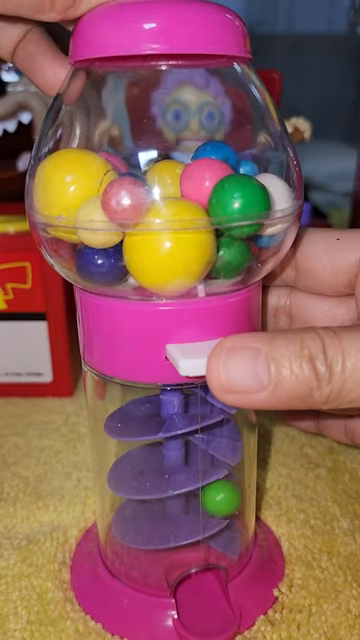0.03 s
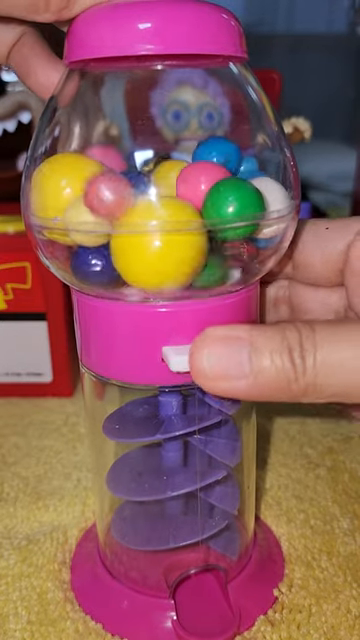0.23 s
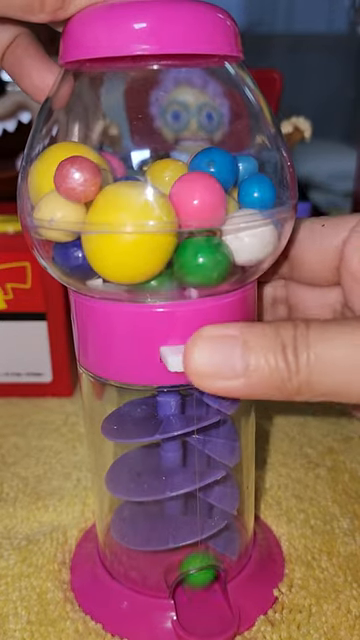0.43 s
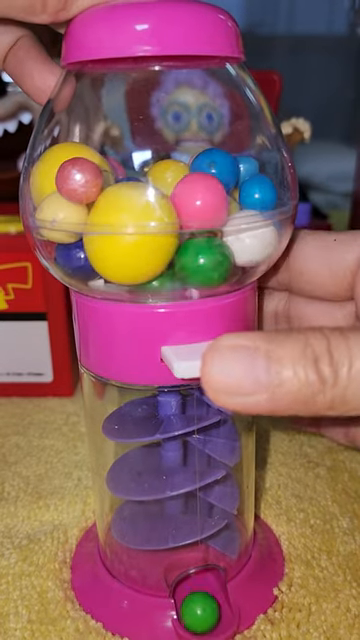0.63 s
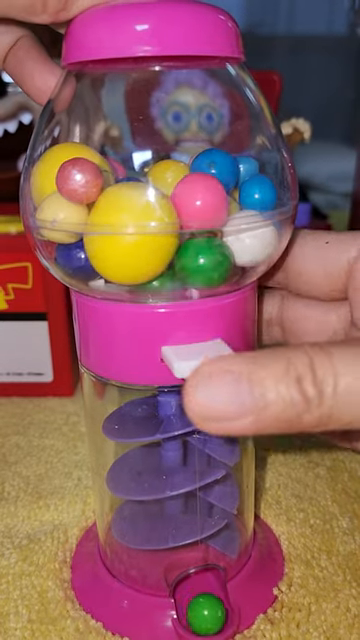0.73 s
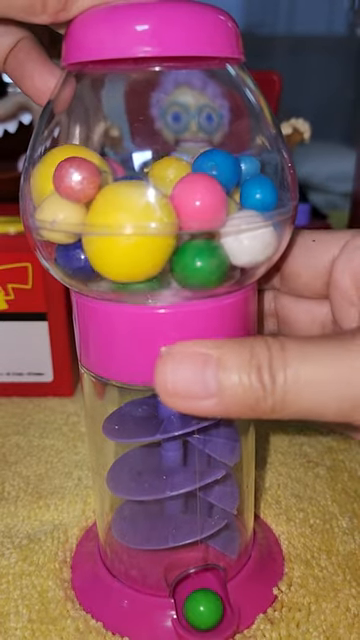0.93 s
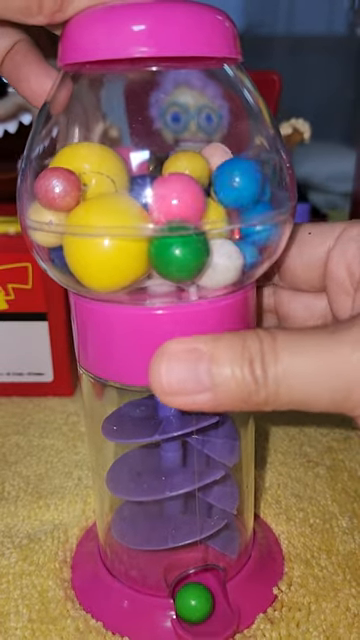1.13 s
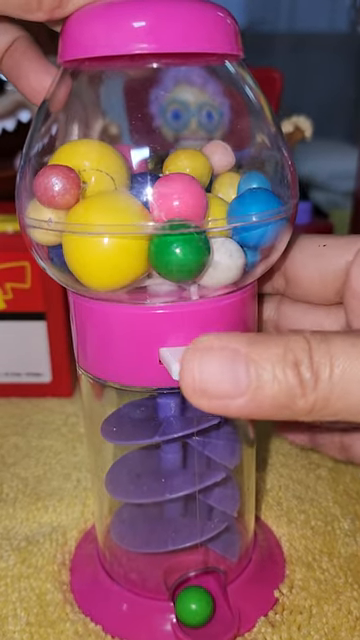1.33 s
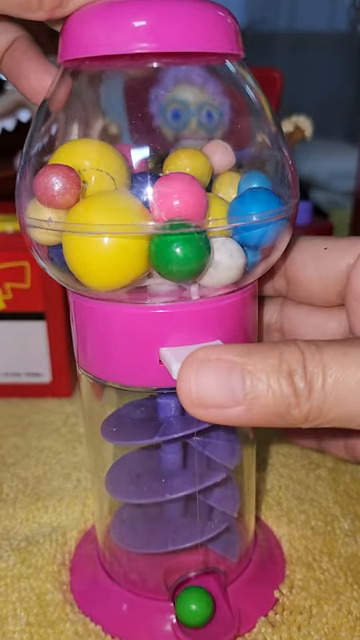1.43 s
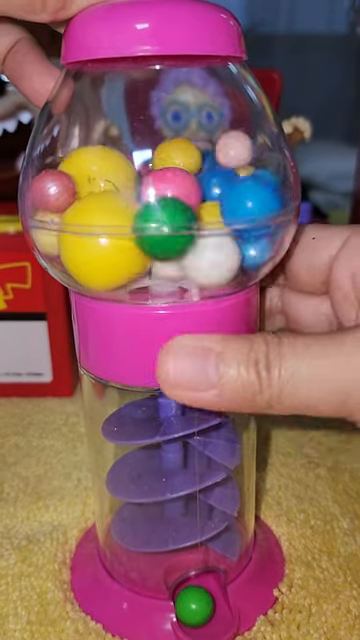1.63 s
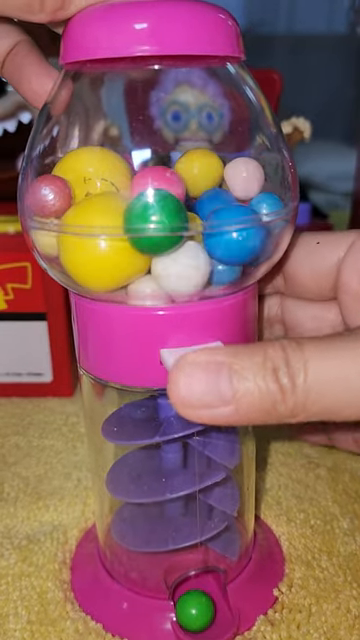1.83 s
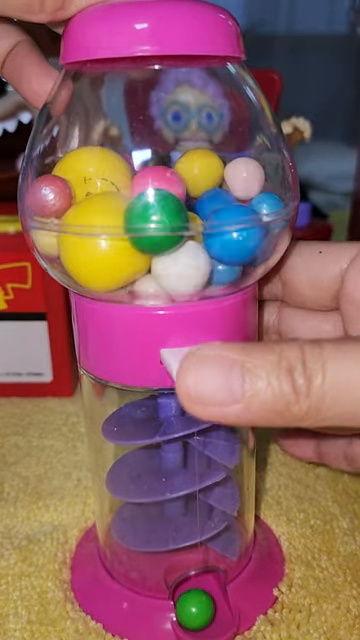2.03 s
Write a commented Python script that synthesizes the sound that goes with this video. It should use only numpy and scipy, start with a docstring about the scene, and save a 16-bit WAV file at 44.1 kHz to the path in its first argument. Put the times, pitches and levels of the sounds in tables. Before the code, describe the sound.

Plastic toy gumball machine rattling and snapping as its lever is pushed three times.

```python
"""A plastic toy gumball machine, close by in a small quiet room, has its lever pushed three times.
Each push churns the balls in the globe: they rattle, ring the shell and boom in the hollow body,
then the sprung lever snaps back. At first a ball rolls and ticks down the spiral chute and drops
into the tray. Another clacks down after the second push, and others settle with single knocks.
A low rumble lies under it all."""
import sys
import numpy as np
from scipy import signal
from scipy.fft import rfft, irfft
from scipy.io import wavfile
from scipy.ndimage import uniform_filter1d

SR = 44100
rng = np.random.default_rng(int(sys.argv[2]) if len(sys.argv) > 2 else 0)


def dump_mix(stems):
    """Bounce the given channels to the path in sys.argv[1] as a 16-bit WAV at rate SR."""
    frames = np.atleast_2d(stems).T  # one column per channel
    limited = np.clip(frames, -1, 1)  # hard clip at full scale
    pcm = np.round(limited * 32767).astype(np.int16)
    wavfile.write(sys.argv[1], SR, pcm)


N = 92610
T = np.arange(N) / SR
ALIKE_BELOW_HZ = 995  # sound is centred below this and wide above it

# One envelope per push. Each row: time in seconds, rattle level in dB, boom level in dB.
PUSHES = [
    [(0.235, -28, -32.5), (0.265, -34, -19), (0.271, -23, -21.5), (0.297, -29.5, -31), (0.313, -27, -30.5),
     (0.333, -43, -27.5), (0.399, -50.5, -42), (0.407, -38.5, -44), (0.44, -58, -49.5)],
    [(0.92, -69, -47), (0.964, -23, -28), (0.98, -30, -41), (0.996, -26.5, -15.5), (1.01, -24.5, -56),
     (1.054, -31, -34.5), (1.072, -38.5, -28), (1.09, -70, -67), (1.13, -65, -73)],
    [(1.56, -59.5, -47), (1.57, -56, -48.5), (1.606, -30, -28.5), (1.63, -23.5, -27), (1.646, -23, -25.5),
     (1.708, -32, -33.5), (1.732, -43.5, -64), (1.746, -60, -51.5), (1.78, -51, -63.5)],
]
# The globe's shell. Each row: frequency in Hz, level in dB, t60 in seconds.
SHELL_MODES = [(326, -25.5, 0.073), (1328, -12.5, 0.13), (1715, 2, 0.042), (2153, -5, 0.03),
               (2736, -17.5, 0.045), (3784, -4, .025), (5600, -24.5, 0.089), (7240, -25.5, 0.041)]
# The air in the hollow body. Each row: frequency in Hz, level in dB, t60 in seconds.
AIR_MODES = [(673, -28, 0.066), (786.6, -3.5, 0.099), (823.7, -5.5, 0.11)]
def churn():
    """The lever stirs the balls: dense clicks that ring the shell and the air inside."""
    rattle_gain = sum(envelope(*np.array(push)[:, [0, 1]].T) for push in PUSHES)
    boom_gain = sum(envelope(*np.array(push)[:, [0, 2]].T) for push in PUSHES)
    hits = contacts(per_s=1500)
    clicks = rattle(hits * rattle_gain)
    shell = resonate(hits * rattle_gain, SHELL_MODES)
    boom = resonate(hits * boom_gain, AIR_MODES)
    return amp(-0.5) * clicks + amp(-3.5) * shell + amp(-4.5) * boom


# EQ of the plastic rattle. Each row: frequency in Hz, gain in dB.
RATTLE_EQ = [(35, -31), (80, -12.5), (160, -3), (310, 6.5), (430, -5.5), (650, 12), (1050, 2), (1500, 5.5),
             (2500, 8.5), (4200, 4), (6500, -3.5), (7600, -7), (9000, -9), (12000, -7.5), (15500, -16)]
def rattle(hits, tilt_db=0, t60=0.011):
    """Every contact makes its own short plastic click."""
    pole = fade(2 / SR, t60)  # power dies twice as fast as amplitude
    power = signal.lfilter([1 - pole], [1, -pole], hits ** 2 + 1e-18)
    return colour(np.sqrt(power) * noise(N), RATTLE_EQ, tilt_db)


# The lever hits its stop. Each row: time in seconds, crack level in dB, ring level in dB,
# crack t60 in seconds, brightness in dB per octave.
SNAPS = [(0.4868, -9, -11, .016, 0.5), (1.1880, -10, -11, 0.022, 0.5), (1.8147, -11, -13.5, 0.019, 1)]
# EQ of the crack. Each row: frequency in Hz, gain in dB.
SNAP_EQ = [(40, -2), (200, -5), (430, -22), (900, -14.5), (1450, 12.5), (2200, -1.5), (3300, 5), (5400, 0),
           (7200, 0.5), (8500, 3), (9400, 1), (10800, 5), (11600, 0.5), (12600, 8), (13700, -5),
           (15000, 3.5), (16000, -23)]
# The lever and its housing. Each row: frequency in Hz, level in dB, t60 in seconds.
LEVER_MODES = [(799.5, -22.5, .22), (1290, -22.5, 0.062), (1288, -20, 0.12), (1447, -22, 0.033),
               (1711, -10, 0.13), (3005, -20, 0.062), (4070, -21.5, 0.085), (5200, -30, 0.089),
               (5370, -12, 0.06), (5740, -36, .04), (12800, -24.5, .03)]
def lever_snaps(lead_s=0.02, rise_s=0.00025, slide_s=0.0075, slide_db=-27):
    """The spring throws the lever back: a brief scrape, a bright crack, a ringing housing."""
    out = np.zeros((2, N))
    t = T[:SR // 4] - lead_s  # zero at the impact
    approach = np.exp(-np.abs(t) / rise_s) + amp(slide_db) * np.exp(-np.abs(t) / slide_s)
    for impact, crack_db, ring_db, t60, tilt_db in SNAPS:
        shape = np.where(t < 0, approach, fade(np.abs(t), t60))
        crack = colour(shape * noise(len(t)), SNAP_EQ, tilt_db)
        add(out, impact - lead_s, amp(crack_db) * crack)
        add(out, impact, amp(ring_db) * ring(LEVER_MODES))
    return out


# Single balls on plastic. Each row: start in seconds, click level in dB, shell level in dB,
# boom level in dB, brightness in dB per octave.
KNOCKS = [(0.2703, -12.5, -24.5, -24, 1), (0.288, -24, -27, -20.5, 4.5), (0.326, -22, -36, -21, -1.5),
          (0.4095, -23.5, -39, -47, 0), (0.5025, -18, -26.5, -43.5, 0.5), (0.573, -27, -48.5, -39.5, -1),
          (0.669, -40.5, -34.5, -50, -2.5), (0.728, -54.5, -60, -51.5, 2),
          (0.8645, -50.5, -60.5, -66.5, -0.5), (0.896, -35.5, -43, -57, -2), (0.912, -41.5, -42, -53, -8),
          (0.9325, -32, -56, -38.5, -3.5), (0.961, -21, -26, -28.5, 5), (0.970, -23.5, -27.5, -26.5, -7.5),
          (0.9922, -14, -24, -16, 5.5), (1.01, -14.5, -43, -37, 4), (1.017, -20, -50, -27, 5),
          (1.0575, -21.5, -55, -34, -1.5), (1.144, -42, -42, -39, 2), (1.532, -48.5, -57, -62, 7),
          (1.5512, -46.5, -53, -51, 6), (1.580, -42.5, -45.5, -53, -10), (1.608, -21, -44, -24.5, 1),
          (1.629, -21, -31, -27, 4), (1.635, -14.5, -25, -23, 3), (1.659, -20.5, -26.5, -26.5, 5),
          (1.684, -20, -40, -25, 3.5), (1.7025, -20, -27, -19.5, 4), (1.7705, -33, -38.5, -63.5, -4.5),
          (2.077, -63, -66, -53, -5)]
# EQ of a ball's click. Each row: frequency in Hz, gain in dB.
KNOCK_EQ = [(30, -26.5), (100, -30), (300, -6.5), (430, -22), (700, 11), (1050, -5), (1500, 7), (2500, 6),
            (4200, 5), (6500, -8.5), (7600, -1.5), (9000, -9.5), (12000, -9.5), (15500, -22)]
def ball_knocks():
    """Single balls strike the globe, lever and tray; a softer touch dulls click and shell alike."""
    out = np.zeros((2, N))
    pivot_hz = SHELL_MODES[2][0]  # the shell's strongest mode
    for start, click_db, shell_db, boom_db, tilt_db in KNOCKS:
        click = colour(burst(t60=0.021, rise_s=0.00016), KNOCK_EQ, tilt_db)
        shell = ring([(hz, db + tilt_db * np.log2(hz / pivot_hz), t60) for hz, db, t60 in SHELL_MODES])
        add(out, start, amp(click_db) * click + amp(shell_db) * shell + amp(boom_db) * ring(AIR_MODES))
    return out


# Two landings, each with one bounce. Each row: start in seconds, clack level in dB,
# brightness in dB per octave, ring level in dB.
DROPS = [(0.4713, -6.5, -1.7, -29), (0.4753, -14, -2.5, -30), (1.2997, -14, -0.2, -35.5),
         (1.304, -14, -3.1, -25.5)]
# EQ of the clack. Each row: frequency in Hz, gain in dB.
DROP_EQ = [(40, -22.5), (300, -8), (450, -9.5), (700, -1.5), (1000, -4.5), (1450, 5), (2200, -0.5),
           (3000, 3), (4200, 6), (6300, -2.5), (8500, -8.5), (11000, -3.5), (15500, -14)]
# The plate the ball lands on. Each row: frequency in Hz, level in dB, t60 in seconds.
PLATE_MODES = [(656.4, -6, 0.046), (817, -7, 0.08), (1430, -13.5, 0.02), (1710, -3.5, 0.086)]
def ball_drops():
    """A falling ball lands on hard plastic with a hollow double clack."""
    out = np.zeros((2, N))
    for start, clack_db, tilt_db, ring_db in DROPS:
        clack = colour(burst(t60=0.019, rise_s=0.00017), DROP_EQ, tilt_db)
        add(out, start, amp(clack_db) * clack + amp(ring_db) * ring(PLATE_MODES))
    return out


# The run down the chute. Each row: time in seconds, tube pitch in Hz, level in dB.
ROLL = [(0, 850, -40.5), (0.07, 842, -40.5), (0.15, 812, -43), (0.22, 775, -41), (0.33, 780, -40),
        (0.43, 790, -54.5)]
def ball_roll(waver_hz=22.6, roughness=0.72):
    """The rolling ball sounds the tube's air, lower as it descends, and grinds over the ramp."""
    times, hz, db = np.array(ROLL).T
    lowpass = signal.butter(2, waver_hz, fs=SR, output="sos")
    drift = signal.sosfilt(lowpass, rng.standard_normal((2, 2 * N)))[:, N:]
    waver = 1 + roughness * (unit(drift[0]) + 1j * unit(drift[1]))  # shakes level and phase
    phase = 2 * np.pi * np.cumsum(np.interp(T, times, hz)) / SR
    tube = unit(np.real(waver * np.exp(1j * phase)))
    gain = envelope(times, db)
    grit = rattle(gain * contacts(per_s=510), tilt_db=-3)
    return gain * tube + amp(-5) * grit


# Touches on the chute wall. Each row: start in seconds, level in dB, brightness in dB per octave.
TICKS = [(0.009, -29.5, -2.5), (0.042, -32, 0), (0.0444, -32, -5), (0.0818, -26, 1), (0.109, -26.5, -3),
         (0.1197, -28.5, -3.5), (0.144, -31, 2), (0.160, -28.5, -0.5), (0.184, -28.5, -4),
         (0.2231, -17, -1.5), (0.239, -27, -0.5), (0.371, -27, 2), (0.4045, -32, 3)]
# EQ of a tick. Each row: frequency in Hz, gain in dB.
TICK_EQ = [(200, -12), (800, -2), (1800, 9), (3000, -4), (4500, 5.5), (5900, 5), (6800, -9), (7700, -14.5),
           (9000, -4), (10500, -6.5), (13300, -5.5), (15000, -11.5)]
# The chute wall. Each row: frequency in Hz, level in dB, t60 in seconds.
CHUTE_MODES = [(1770, -4.5, .03), (4410, -7, 0.027), (5850, -2.5, 0.029), (7600, -3.5, 0.013),
               (10620, -7, 0.023)]
def chute_ticks():
    """The rolling ball glances off the thin chute and rings it lightly."""
    out = np.zeros((2, N))
    for start, db, tilt_db in TICKS:
        click = colour(burst(t60=0.022, rise_s=0.00056), TICK_EQ, tilt_db)
        add(out, start, amp(db) * (click + amp(-9.5) * ring(CHUTE_MODES)))
    return out


# A small swell before the third push. Each row: time in seconds, level in dB.
RUB = [(1.33, -64), (1.40, -63), (1.45, -54), (1.52, -59.5), (1.57, -61.5)]
# EQ of the rub. Each row: frequency in Hz, gain in dB.
RUB_EQ = [(300, -6), (1500, 3), (5000, -1), (7000, 4.5), (9000, -1), (15000, -4.5)]
def rub():
    """A faint hiss of friction, like a thumb sliding on the plastic."""
    return envelope(*np.array(RUB).T) * unit(colour(noise(N), RUB_EQ))


# EQ of the reverb tail. Each row: frequency in Hz, gain in dB.
ROOM_EQ = [(100, 13), (400, 5), (800, -2.5), (2500, -3.5), (5000, -3), (7500, 6), (12000, 0), (16000, -3)]
def room(x, low_t60=0.44, treble_t60=0.26, split_hz=5600, rise_s=0.0027, echo_s=0.0148):
    """The small room adds one near reflection and a short tail whose treble dies first."""
    t = T[:SR * 3 // 4]
    wash = noise(len(t))
    low = signal.sosfiltfilt(signal.butter(2, split_hz, fs=SR, output="sos"), wash)
    tail = low * fade(t, low_t60) + (wash - low) * fade(t, treble_t60)
    tail *= 1 - np.exp(-t / rise_s)
    tail = colour(tail / np.sqrt(np.sum(tail ** 2) / 2), ROOM_EQ)
    out = x + amp(-13.5) * signal.fftconvolve(x, tail, axes=1)[:, :N]
    add(out, echo_s, amp(-21) * x)
    return out


# EQ of the room tone. Each row: frequency in Hz, gain in dB.
RUMBLE_EQ = [(15, -37.5), (27, -25.5), (42, 4), (65, -6), (120, -5.5), (200, -14), (400, -26), (620, -28.5),
             (780, -16.5), (1000, -37.5), (1700, -30), (2400, -36.5), (5000, -37.5), (10000, -42.5),
             (16000, -42)]
def rumble():
    """A steady bed of low, quiet noise."""
    return amp(-53.5) * unit(colour(noise(N), RUMBLE_EQ))


def amp(db):
    """Decibels to gain."""
    return 10 ** (np.asarray(db) / 20)


def unit(x):
    """Scale to rms 1."""
    return x / np.sqrt(np.mean(x ** 2))


def fade(t, t60):
    """Decay by 60 dB in t60 seconds."""
    return np.exp(-np.log(1000) * t / t60)


def envelope(times, db):
    """Gain along a level curve, silent outside it."""
    return amp(np.interp(T, times, db, left=-150, right=-150))


def add(out, start, x):
    """Mix x in at a start time in seconds."""
    i = max(int(start * SR), 0)
    out[:, i:i + x.shape[1]] += x[:, :N - i]


def colour(x, points, tilt_db=0):
    """Minimum-phase EQ through (Hz, dB) points, tilted per octave about 3 kHz."""
    size = 8192
    freqs = np.maximum(np.fft.rfftfreq(size, 1 / SR), 10)
    hz, db = np.array(points).T
    octaves = np.log2(np.maximum(freqs, 500) / 3000)
    gain = amp(np.interp(np.log(freqs), np.log(hz), db) + tilt_db * octaves)
    cepstrum = irfft(np.log(gain))
    cepstrum[1:size // 2] *= 2  # folded forward, so nothing rings ahead of a hit
    cepstrum[size // 2 + 1:] = 0
    response = irfft(np.exp(rfft(cepstrum)))
    return signal.fftconvolve(x, response[None], axes=1)[:, :x.shape[1]]


def noise(n):
    """Stereo noise, alike left and right in the bass and unrelated in the treble."""
    spectra = rfft(rng.standard_normal((3, n)))
    alike = 1 / (1 + (np.fft.rfftfreq(n, 1 / SR) / ALIKE_BELOW_HZ) ** 6)
    return irfft(spectra[0] * np.sqrt(alike) + spectra[1:] * np.sqrt(1 - alike), n)


def burst(t60, rise_s):
    """The short noise of one contact."""
    t = T[:SR // 4]
    return noise(len(t)) * fade(t, t60) * (1 - np.exp(-t / rise_s))


def contacts(per_s, scatter_db=3):
    """Random contacts of uneven strength, with an even mean power near 1."""
    touches = rng.random(N) < per_s / SR
    hits = touches * amp(scatter_db * rng.standard_normal(N)) * rng.choice([-1, 1], N)
    power = np.abs(uniform_filter1d(hits ** 2, size=700))
    return hits / np.sqrt(power + 1e-9)


def ring(modes):
    """Modes ring after one blow; the high ones reach the two sides a quarter cycle apart."""
    t, out = T[:SR // 4], 0
    for hz, db, t60 in modes:
        phase = rng.choice([-1, 1]) * np.array([[1], [-1]]) * np.pi / 4 * (hz > ALIKE_BELOW_HZ)
        detune = 1 + .002 * rng.standard_normal()
        out = out + amp(db) * fade(t, t60) * np.sin(2 * np.pi * hz * detune * t + phase)
    return out


def resonate(hits, modes):
    """Contacts ring a set of modes, keeping their power."""
    response = ring(modes)
    response /= np.sqrt(np.sum(response ** 2) / 2)
    return signal.fftconvolve(hits[None], response, axes=1)[:, :N]


def pan(x, balance):
    """Share a source between left and right by frequency."""
    left = colour(x[[0]], [(hz, db / 2) for hz, db in balance])
    right = colour(x[[1]], [(hz, -db / 2) for hz, db in balance])
    return np.vstack([left, right])


# Stereo placement of the balls and of the lever. Each row: frequency in Hz, left minus right in dB.
BALL_PAN = [(300, 1.5), (750, -3.5), (1400, 1), (2600, -.5), (4800, 7), (7000, 13.5), (9500, -1.5),
            (13000, 4)]
LEVER_PAN = [(300, 2), (750, -7), (1400, 0), (2800, -1.5), (5000, 11.5), (7000, 7), (9500, -1),
             (13000, 7.5)]
def scene():
    """The toy, leaning left in the treble, in the room over a low rumble."""
    balls = pan(churn() + ball_knocks() + ball_drops() + ball_roll() + chute_ticks(), BALL_PAN)
    lever = pan(lever_snaps() + rub(), LEVER_PAN)
    return room(balls + lever) + rumble()


def record(dry, low_cut_hz=34, top_hz=16200):
    """The recorder thins the deepest bass, clips near full scale and cuts the top."""
    thin = signal.sosfilt(signal.butter(3, low_cut_hz, "highpass", fs=SR, output="sos"), dry)
    clipped = np.clip(thin, -.88, .88)
    return signal.sosfilt(signal.ellip(8, .2, 70, top_hz, fs=SR, output="sos"), clipped)


dry = scene()
out = record(dry)
dump_mix(out)
```